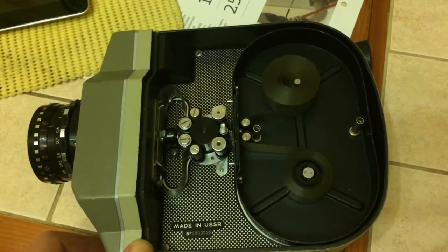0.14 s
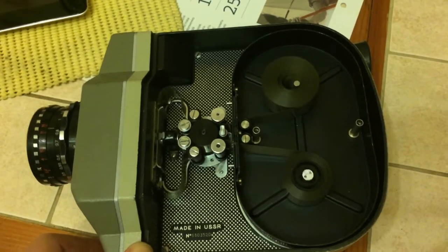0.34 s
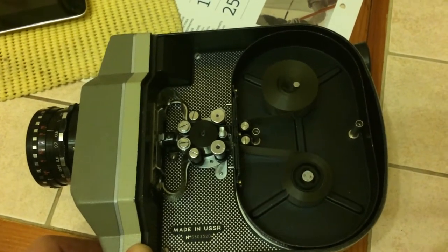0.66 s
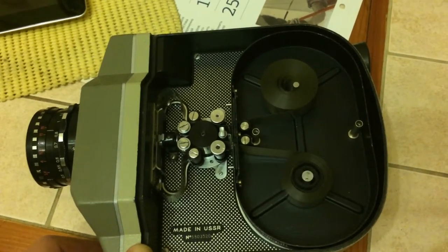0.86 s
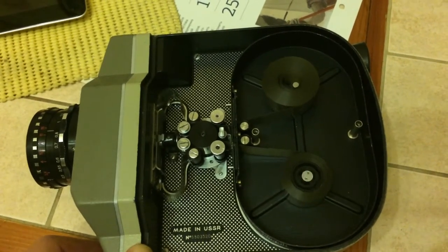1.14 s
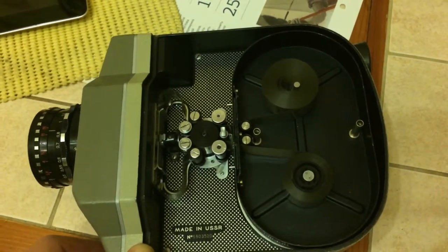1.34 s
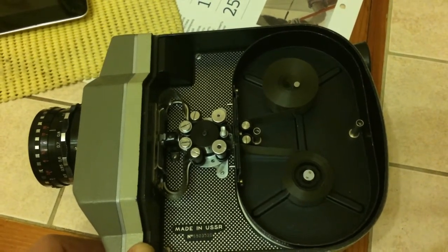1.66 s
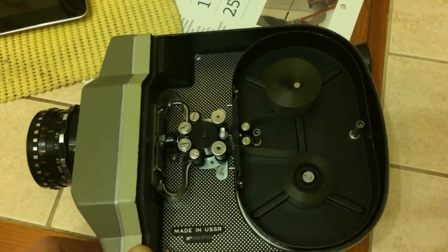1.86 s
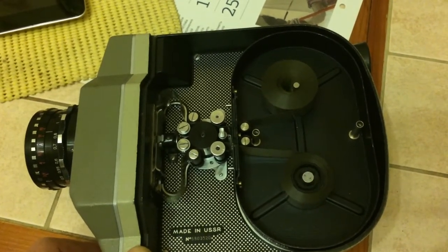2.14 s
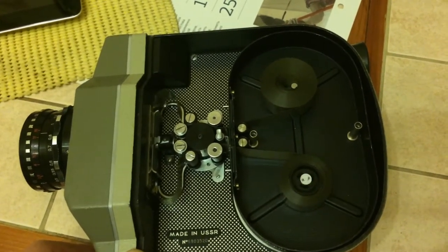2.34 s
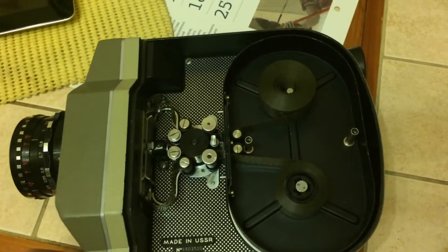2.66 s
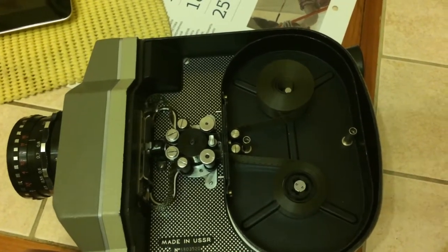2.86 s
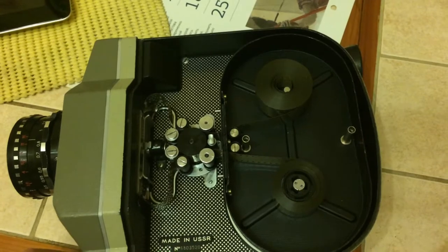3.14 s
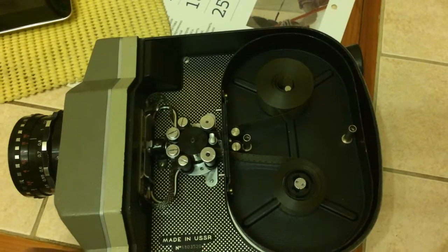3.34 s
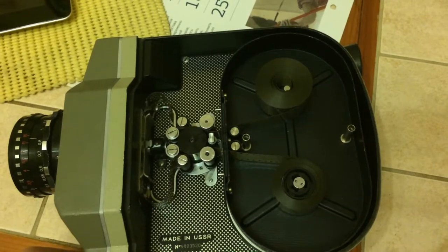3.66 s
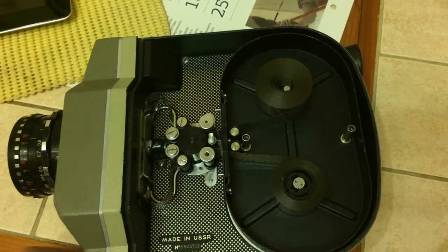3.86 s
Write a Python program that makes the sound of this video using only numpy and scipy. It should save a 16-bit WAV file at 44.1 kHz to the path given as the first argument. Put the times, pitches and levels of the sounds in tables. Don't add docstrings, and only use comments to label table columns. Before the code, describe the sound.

A spring-driven film camera with its cover open whirs and clatters fast and steadily, then stops abruptly with a bouncing knock and short ring; quiet room rumble and faint ticking remain. Close microphone, small tiled room.

```python
import sys
import numpy as np
from scipy import signal
from scipy.io import wavfile

SR = 44100
rng = np.random.default_rng(int(sys.argv[2]) if len(sys.argv) > 2 else 0)


def rack_gain(trim_db):
    fader = np.asarray(trim_db, float)
    return 10 ** (fader / 20)


def store_wav(level_fs):
    pcm = np.round(np.clip(np.atleast_2d(level_fs), -1, 1) * 32767)
    wavfile.write(sys.argv[1], SR, pcm.T.astype(np.int16))


N = 176400

STOP_S = 2.505
FRAME_S, CLAW_S = .03976, .018

# centre [Hz], width [Hz], level [dB].
HOUSING = [(378.4, 30, -2.5), (487, 11, -10.5), (565, 103, -17.5), (1034.5, 198, -4), (1202, 97, -4),
           (1360, 148, -5), (1659, 116, 3), (1783, 113, 0), (1981, 147, -1), (2172, 155, 2.5),
           (2225, 153, -6), (2470, 93, -9), (2680, 90, -6.5), (2795, 730, -17)]
# centre [Hz], width [Hz], level [dB].
PLATES = [(3300, 194, -9), (3660, 77, -32.5), (4840, 550, -15.5), (4960, 265, -9), (5194, 150, -14.5),
          (5800, 440, -15.5), (6760, 350, -11.5), (7920, 190, -16.5), (9340, 520, -19), (11340, 1200, -18),
          (12100, 550, -18.5), (13000, 710, -26), (14500, 1400, -25)]


def rms_one(x):
    return x / np.sqrt(np.mean(x ** 2) + 1e-20)


def clock():
    return np.arange(N) / SR


def drift(rate_hz):
    r = np.exp(-80 * np.pi * rate_hz / SR)
    noise = rng.standard_normal(N // 40 + 2002)
    slow = signal.lfilter([1], [1, -2 * r, r * r], noise)[2000:]
    return np.interp(np.arange(N) / 40, np.arange(len(slow)), rms_one(slow))


def butter(x, order, hz, kind):
    return signal.sosfilt(signal.butter(order, hz, kind, fs=SR, output="sos"), x)


def resonate(x, hz, width_hz):
    r = np.exp(-np.pi * width_hz / SR)
    poles = [1, -2 * r * np.cos(2 * np.pi * hz / SR), r * r]
    return signal.lfilter([(1 - r * r) / 2, 0, (r * r - 1) / 2], poles, x + 1e-18)


def strike(x, body, vary_db=0.):
    out = 0
    for k, (hz, width_hz, db) in enumerate(body):
        out = out + (-1) ** k * rack_gain(db) * resonate(x * rack_gain(vary_db * drift(59)), hz, width_hz)
    return out


def bands(x, spectrum, patchy_db):
    out = 0
    edges = 22 * 2 ** np.arange(0, 9.6, .5)
    hz, db = np.transpose(spectrum)
    for k, (low, high) in enumerate(zip(edges, edges[1:])):
        band = butter(x[k % 2], 2, [low, high], "band")
        level_db = np.interp(np.log(low * high) / 2, np.log(hz), db)
        out = out + band * rack_gain(level_db + patchy_db * drift(7.7))
    return rms_one(out)


def bursts(s, db, spread_s, rattle=0.13):
    out, size = np.zeros(N + SR), 400
    shape = rattle * np.exp(-np.arange(size) / (spread_s * SR))
    click = np.arange(size) == 0
    for at, level_db, noise in zip(s, db, rng.standard_normal((len(s), size))):
        contact = shape * noise + click
        start = int(at * SR)
        out[start:start + size] += rack_gain(level_db) * contact / np.sqrt(np.sum(contact ** 2))
    return out[:N]


def floor_noise():
    # frequency [Hz], density [dB per Hz].
    spectrum = [(28, -17.5), (90, -6.5), (250, -14), (480, -22.5), (900, -21.5), (1700, -35), (4500, -44),
                (15000, -49.5)]
    return rack_gain(-57) * bands(rng.standard_normal((2, N)), spectrum, patchy_db=1.5)


def rumble():
    # centre [Hz], width [Hz], level [dB rms].
    room_tones = [(107.6, 8, -62), (140.6, 10, -66), (209.7, 11.6, -68.5), (7400, 200, -88),
                  (6450, 150, -93), (8300, 150, -96)]
    out = 0
    for hz, width_hz, db in room_tones:
        level = rack_gain(db + 2.9 * drift(3.4))
        noise = rng.standard_normal(N + SR)
        tone = resonate(resonate(noise, hz, width_hz), hz, width_hz)[SR:]
        out = out + level * rms_one(tone)
    return out


def squeal():
    # time [s], pitch [Hz], level [dB].
    glide = [
        (3.55, 6400, -100),
        (3.56, 6400, -84),
        (3.595, 6450, -85),
        (3.6, 7080, -77),
        (3.65, 6980, -77),
        (3.72, 7080, -78),
        (3.755, 7100, -80),
        (3.765, 7100, -100),
    ]
    s, hz, db = np.transpose(glide)
    pitch_hz = np.interp(clock(), s, hz) + 70 * drift(209)
    level_db = np.interp(clock(), s, db, -200, -200) + 1.5 * drift(50)
    return rack_gain(level_db) * np.sin(2 * np.pi * np.cumsum(pitch_hz) / SR)


def appliance():
    # time within a turn [s], level [dB], jitter [s].
    pattern = [
        (.0065, -64, 0.00051),
        (.031, -62.5, 0.00064),
        (0.0555, -61.5, 0.00049),
        (.065, -62, .001),
        (0.0969, -61.5, 0.0014),
    ]
    # centre [Hz], width [Hz], level [dB].
    casing = [(2160, 270, 4.5), (3450, 230, -2), (5100, 970, -11)]
    turn_s, snap_s = .1, 3.979
    turns = np.arange(0, N / SR, turn_s)
    s, db, jitter_s = np.transpose(pattern)
    chance = rng.standard_normal((2, len(turns), len(s)))
    tick_s = turns[:, None] + s + jitter_s * chance[0]
    tick_db = db + 1.0 * chance[1]
    ticks = bursts(tick_s.ravel(), tick_db.ravel(), 0.00035, rattle=0.04)
    ticking = butter(strike(ticks, casing), 2, 1500, "high")
    snap = bursts([snap_s], [-50], 0.0012, rattle=0.11)
    snap_low = resonate(resonate(snap, 4300, 900), 4200, 1400)
    snap_high = resonate(resonate(snap, 6500, 2500), 6400, 2500)
    return rack_gain(29) * ticking + rack_gain(22) * snap_low + rack_gain(13) * snap_high


def room(x):
    t60_s, wall_cut_hz, first_echo_s = 0.33, 5400, .004
    t = np.arange(SR // 2) / SR
    tail = rng.standard_normal(len(t)) * rack_gain(-60 * t / t60_s) * (t > first_echo_s)
    tail = butter(tail, 1, wall_cut_hz, "low")
    return rack_gain(-14) * signal.fftconvolve(x, tail / np.sqrt(np.sum(tail ** 2)))[:N]


def lid():
    # pitch [Hz], peak level [dB], t60 [s].
    modes = [(1768, -57, 1.0), (1179, -50, .23), (1346, -53, .24), (1927, -60, .4), (2304, -58, .4)]
    t = clock() - STOP_S
    out = 0
    for hz, db, t60_s in modes:
        out = out + rack_gain(db - 60 * t.clip(0) / t60_s) * np.sin(2 * np.pi * hz * t) * (t > 0)
    return out


def button():
    land_s, thump_hz, decay_s = 2.569, 420, .0013
    t = np.maximum(clock() - land_s, 0)
    return rack_gain(-33) * np.sin(2 * np.pi * thump_hz * t) * np.exp(-t / decay_s)


def running_db():
    # time [s], level [dB].
    coast = [
        (2.505, 0),
        (2.52, -7),
        (2.545, -15),
        (2.581, -19.5),
        (2.6, -26),
        (2.62, -49),
        (2.7, -80),
    ]
    return np.interp(clock(), *np.transpose(coast))


def governor():
    # multiple of the speed, level [dB rms].
    harmonics = [(1, -56), (2, -55), (3, -65)]
    # time [s], turns per second [Hz].
    spin = [(0, 70.4), (.44, 68.7), (.6, 69.6), (1.0, 68.5), (1.17, 70.5), (1.38, 68.35), (1.6, 68.4),
            (1.72, 70.25), (1.9, 68.2), (2.05, 68), (2.22, 70.3), (2.35, 68.6), (2.5, 68.3), (2.6, 64)]
    speed_hz = np.interp(clock(), *np.transpose(spin)) + 0.67 * drift(14.3)
    turns = np.cumsum(speed_hz) / SR
    out = 0
    for multiple, db in harmonics:
        level = np.sqrt(2) * rack_gain(db + 1.54 * drift(5.2) + .3 * running_db())
        out = out + level * np.sin(2 * np.pi * int(multiple) * turns)
    return out


def pawl():
    # time [s], level [dB], brightness [dB].
    bounces = [(2.478, -30, -5), (2.49, -23, -10), (2.494, -22, -11), (2.4972, -18, -11), (2.502, -23, -17),
               (2.508, -31, -16), (2.515, -35, -15), (2.523, -36, -6), (2.532, -39, -12),
               (2.5556, -36, -15), (2.562, -46, 1), (2.569, -46, -10), (2.574, -50, -3), (2.59, -48, -4),
               (2.598, -48, -6)]
    # centre [Hz], width [Hz], level [dB].
    case_body = [(204, 47, -4), (380, 48, 1), (780, 140, -8.5), (1150, 270, 0), (1370, 150, 2.5)]
    rattle_s = .004
    s, db, bright_db = np.transpose(bounces)
    bright = bursts(s, db + bright_db, rattle_s)
    blows = bursts(s, db, rattle_s)
    thud = rack_gain(23.5) * strike(bursts(s, db, rattle_s), case_body)
    return bright, blows, thud


def claw_strokes():
    jitter_s, level_db = .002, -35.5
    frames = np.arange(CLAW_S, STOP_S - .03, FRAME_S)
    chance = rng.standard_normal((len(frames), 2))
    return bursts(frames + jitter_s * chance[:, 0], level_db + 2.0 * chance[:, 1], 0.0011)


def claw_and_pawl():
    # time [s], level [dB].
    hard_ticks = [(0.1775, -36), (0.2157, -26.5), (0.462, -22), (0.6504, -32), (0.69, -28), (0.8131, -28),
                  (0.973, -32), (1.05, -27.5), (1.0923, -28.5), (1.288, -32), (1.3296, -29), (1.372, -30),
                  (1.4518, -25), (1.646, -26.5), (1.7512, -26.5), (1.8061, -32), (1.848, -29), (1.889, -30),
                  (2.0087, -28.5), (2.0896, -34), (2.162, -28.5), (2.2815, -26.5), (2.3612, -37),
                  (2.4044, -29.5)]
    # time [s], level [dB].
    housing_knocks = [(0.0667, -23), (0.0962, -43), (0.1481, -37), (0.2129, -26), (0.2598, -21),
                      (0.3287, -21), (0.3621, -24), (0.3945, -39), (0.4184, -34), (0.4623, -23.5),
                      (0.4993, -28), (0.612, -37), (0.6519, -16), (0.7721, -16), (0.819, -25),
                      (0.8545, -20), (0.9183, -44), (0.9333, -26), (0.9612, -19), (0.9737, -21),
                      (1.052, -21), (1.076, -25), (1.0939, -26), (1.1333, -22), (1.1777, -21),
                      (1.2755, -35), (1.2905, -19), (1.3503, -31), (1.3708, -18), (1.4102, -19),
                      (1.4536, -17), (1.5289, -35), (1.711, -28), (1.8078, -34), (1.8891, -15),
                      (1.927, -27), (1.9485, -20.5), (1.9769, -34), (2.0088, -25), (2.0497, -25),
                      (2.0901, -22.5), (2.136, -21), (2.1655, -38), (2.1919, -21), (2.2847, -39.5),
                      (2.3231, -16), (2.361, -21), (2.4044, -21), (2.4558, -24), (2.4912, -27)]
    hardest_knock_db = -21
    strokes = claw_strokes()
    pawl_bright, pawl_blows, thud = pawl()
    ticks = strokes + bursts(*np.transpose(hard_ticks), 0.0028, rattle=0.76) + pawl_bright
    knock_s, knock_db = np.transpose(housing_knocks)
    knocks = bursts(knock_s, np.minimum(knock_db, hardest_knock_db), 0.0045, rattle=0.39)
    knocks = butter(knocks + rack_gain(8.0) * strokes, 2, 750, "high") + pawl_blows
    crack = rack_gain(3.0) * butter(ticks, 2, [3000, 15000], "band")
    plates = rack_gain(30.5) * strike(ticks, PLATES, vary_db=.8)
    housing = rack_gain(24.5) * strike(knocks, HOUSING, vary_db=1.5)
    return thud + crack + plates + housing


def gears():
    # time [s], level [dB], looseness of the cover [dB].
    drive = [(0, -36, -8), (.2, -36.5, -8), (.27, -36, -3.5), (.37, -36.5, -3.5), (.42, -36, -16),
             (.62, -36.5, -11.5), (.68, -37, -2), (.76, -37, -2), (.95, -36.5, -12), (1.25, -37.5, -8.5),
             (1.4, -37, -11), (1.6, -38, -7), (1.8, -37, -7), (1.929, -37.5, -4), (2.1, -37.5, -5.5),
             (2.3, -38, -3.5), (2.47, -37, -6.5)]
    # centre [Hz], width [Hz], level [dB].
    cover_body = [(2169, 64, 0.5), (2264, 94, -7.5), (385.6, 28, -11.5), (1802, 22, -18)]
    # frequency [Hz], density [dB per Hz].
    rattle_spectrum = [(60, -33), (330, -8.5), (650, -25.5), (1050, -5), (2200, -7), (3000, -12.5),
                       (7000, -21), (15000, -36)]
    teeth_per_s, tooth_spread_db = 2500, 1
    s, drive_db, loose_db = np.transpose(drive)
    sizes = rack_gain(tooth_spread_db * np.minimum(rng.exponential(1, (2, N)), 4))
    sizes = sizes * rng.choice([-1, 1], (2, N))
    contacts = rng.random((2, N)) < teeth_per_s / SR
    teeth = sizes * contacts * rack_gain(1.28 * drift(44))
    body = rms_one(strike(teeth[0], HOUSING + PLATES, vary_db=2.5))
    cover = 0
    for hz, width_hz, db in cover_body:
        swell = rack_gain(db + 2 * drift(3.5))
        cover = cover + swell * rms_one(resonate(teeth[1], hz, width_hz))
    cover = cover * rack_gain(np.interp(clock(), s, loose_db))
    rattle = rack_gain(-3) * bands(teeth[::-1], rattle_spectrum, patchy_db=.7)
    level_db = np.interp(clock(), s, drive_db) - 2.0 + running_db()
    return (body + cover + rattle) * rack_gain(level_db)


def scene():
    background = floor_noise() + rumble() + squeal() + appliance()
    camera = governor() + button() + claw_and_pawl() + gears()
    return (background + camera + room(camera) + lid())[None]


def roll_off(x):
    return signal.sosfilt(signal.butter(12, 16410, fs=SR, output="sos"), x)


def record(dry):
    steep = signal.ellip(12, .5, 60, 15290, fs=SR, output="sos")
    mix = signal.sosfilt(steep, dry)
    return roll_off(mix)


dry = scene()
out = record(dry)
store_wav(out)
```